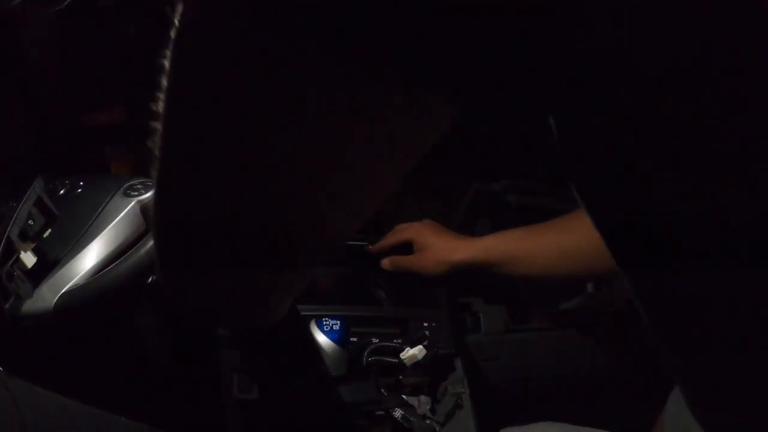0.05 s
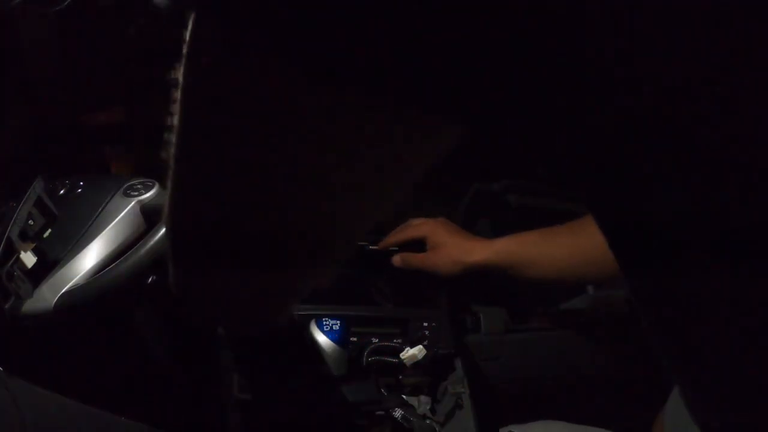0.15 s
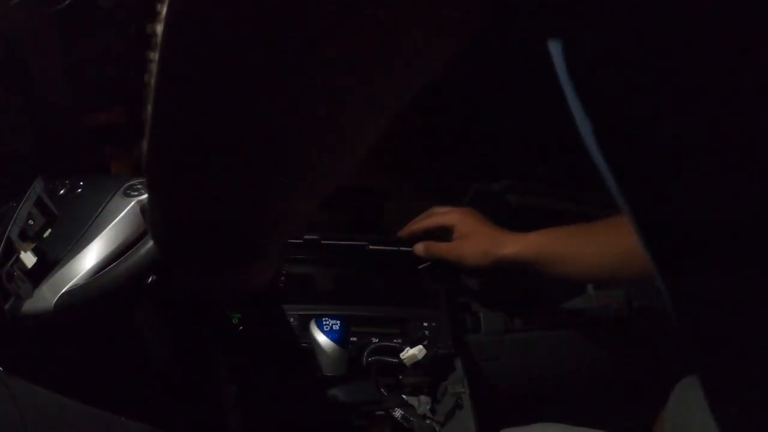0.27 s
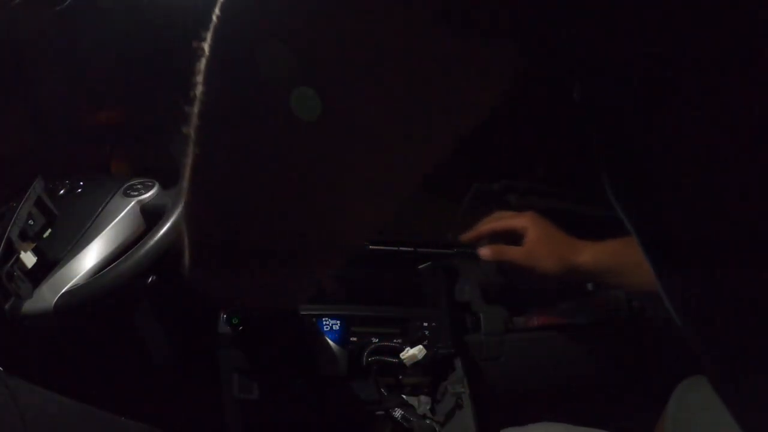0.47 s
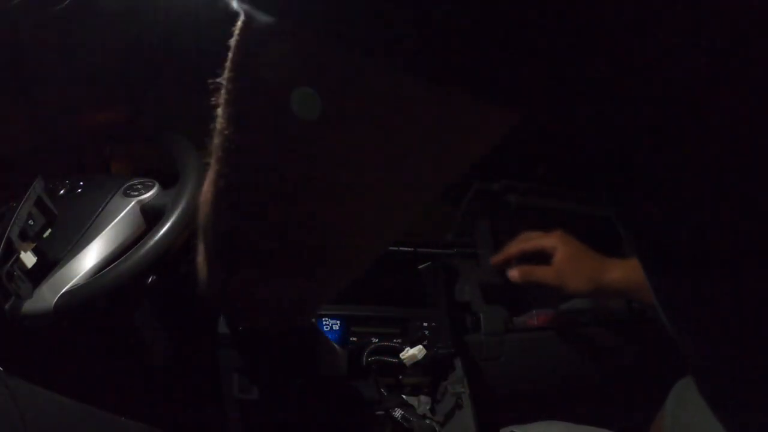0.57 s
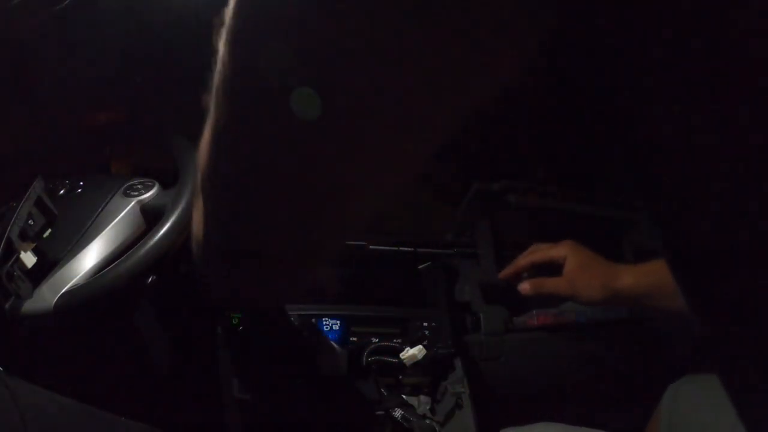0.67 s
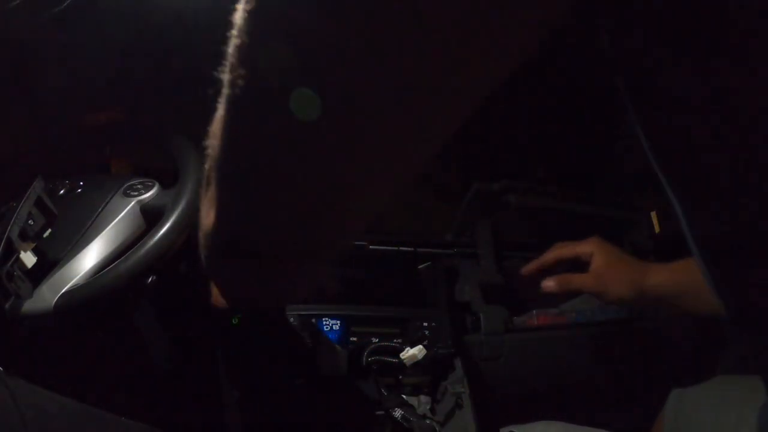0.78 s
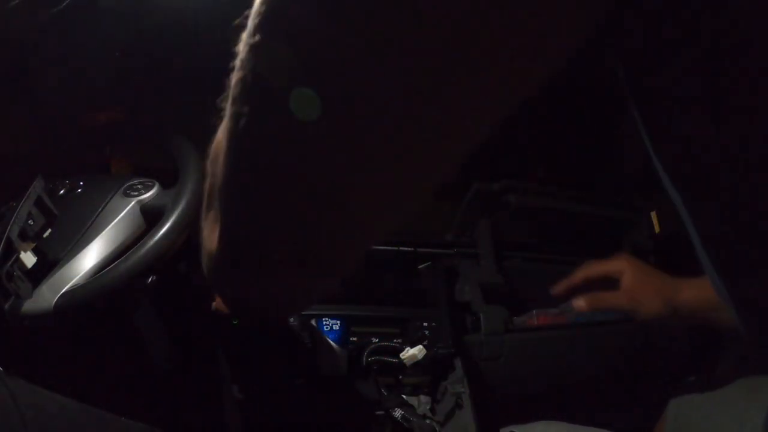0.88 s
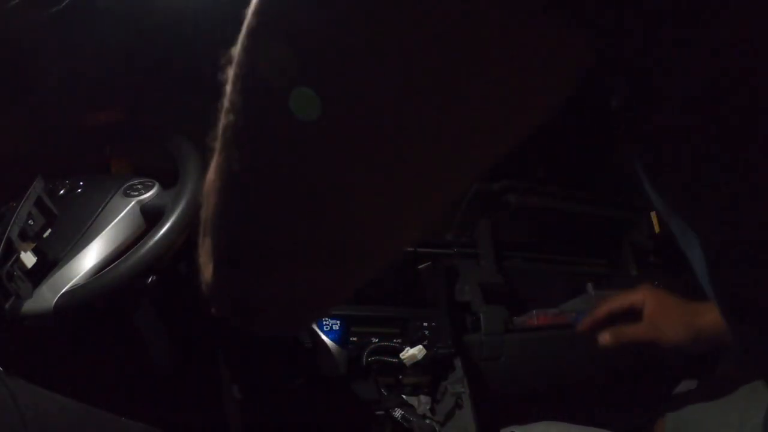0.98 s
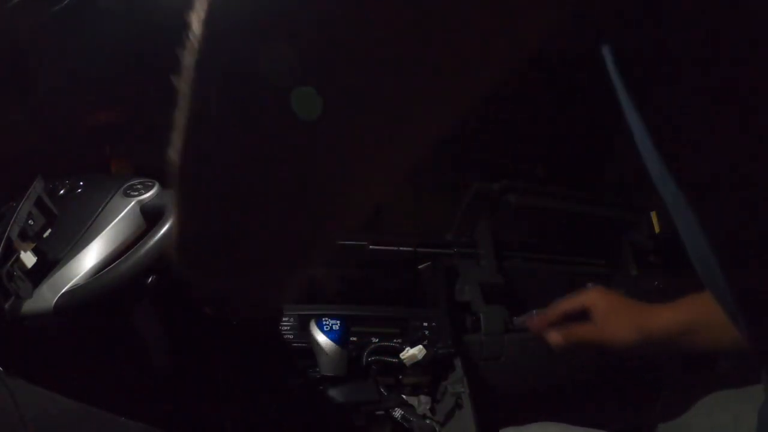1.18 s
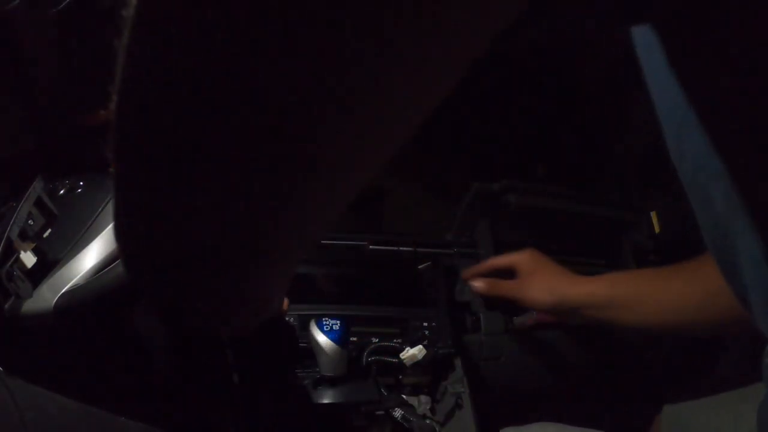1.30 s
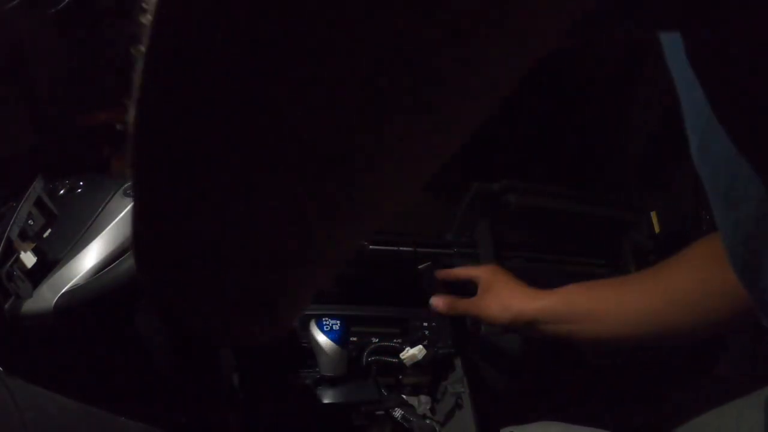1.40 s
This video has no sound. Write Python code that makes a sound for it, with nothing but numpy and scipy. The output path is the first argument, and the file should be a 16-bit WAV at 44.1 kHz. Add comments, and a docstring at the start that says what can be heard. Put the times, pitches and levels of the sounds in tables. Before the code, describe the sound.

A plastic dashboard compartment unlatches with a tick and a sharp double clunk at about 0.2 seconds, close and slightly left, briefly rattling loose parts. From 0.4 to 0.9 seconds fingers lightly scrape and tap hollow plastic while a sleeve rustles. Around 1.1 seconds the lid knocks and bumps more softly, followed by faint cloth rubbing near 1.3 seconds. A low rumble fills the quiet car throughout.

```python
"""Unlatching a dashboard compartment

Inside a quiet car, stereo microphone close to the dashboard; a low rumble fills the small padded cabin.
A hand works the plastic latch, just left of centre: a tick, then a sharp double clunk that rings the
trim and rattles loose parts. Fingers scrape and tap the hollow plastic, the lid bumps on its damped
stop, a sleeve rustles and an arm rubs on the upholstery."""
import sys
import numpy as np
from scipy import signal
from scipy.fft import rfft, irfft
from scipy.io import wavfile

SR = 44100
rng = np.random.default_rng(int(sys.argv[2]) if len(sys.argv) > 2 else 0)


def store_wav(level_fs):
    """Save 16-bit WAV to argv[1]."""
    pcm = np.round(np.clip(np.atleast_2d(level_fs), -1, 1) * 32767)
    wavfile.write(sys.argv[1], SR, pcm.T.astype(np.int16))


N = 63945

# stereo width of the noises at the microphone: f/Hz, side minus mid/dB
STEREO_WIDTH = [(50, -20.5), (250, -15), (700, -8), (2000, -7), (4500, -4.5), (12000, -2)]
# spectrum of the cabin rumble: f/Hz, relative density/dB
RUMBLE_COLOUR = [(12, -8.5), (28, 4.5), (45, 10.5), (68, -7.5), (115, -7), (180, -13), (300, -25),
                 (480, -30.5), (800, -48.5), (4000, -100)]
# the rumble swells and sinks: t/s, level/dB
RUMBLE_SWELLS = [(0, -39.5), (0.081, -39), (.17, -47), (.33, -34.5), (.40, -38.5), (0.531, -43),
                 (.64, -40.5), (.77, -46.5), (.85, -37.5), (.93, -39), (1.0, -44.5), (1.08, -34),
                 (1.12, -28), (1.21, -39), (1.45, -46)]
# spectrum of the faint air noise: f/Hz, relative density/dB
AIR_COLOUR = [(300, 0.5), (750, -6.5), (1250, -1), (1800, -14), (3000, -19), (6000, -24.5), (11000, -42.5),
              (16000, -65.5)]
# steady hum in the cabin: f/Hz, rms level/dB
HUM_TONES = [(47.5, -52.5), (95.5, -61.5)]
# the arm shifts against seat and console: t/s, level/dB, rise/s, hold/s, fall/s
ARM_SHIFTS = [(0.432, -48.5, 0.044, 0.047, 0.042), (0.618, -47.5, .06, 0.026, 0.052),
              (0.715, -46, 0.011, 0.066, 0.082), (0.828, -56, 0.02, 0.134, 0.11),
              (1.204, -47, 0.31, 0.11, 0.01)]
# spectrum of rubbed upholstery: f/Hz, relative density/dB
UPHOLSTERY_COLOUR = [(50, -7), (130, 3), (320, -7), (550, -19.5), (800, -25), (1500, -24.5), (8000, -53)]
# swishes of the sleeve: t/s, level/dB, rise/s, hold/s, fall/s, treble gain/dB
SLEEVE_SWISHES = [(-.01, -55.5, .02, 0.057, 0.042, 9), (0.41, -60.5, 0.025, 0.061, 0.011, 6),
                  (0.806, -56.5, 0.082, 0.011, 0.044, 2), (0.897, -59.5, 0.01, 0.006, 0.066, 0),
                  (1.059, -58.5, 0.0076, 0.012, 0.014, 1), (1.235, -52.5, 0.0049, 0.0033, 0.017, -15),
                  (1.29, -49.5, 0.042, 0.075, 0.17, 1)]
# spectrum of sliding cloth: f/Hz, relative density/dB
SLEEVE_COLOUR = [(300, -32), (800, -4), (1200, 5), (1700, -2.5), (2400, 3.5), (3600, -1), (4700, 3),
                 (6500, -6), (10000, -9), (13000, -17), (16000, -38)]
# fingers scrape the plastic: loudest at t/s, level/dB, rise/s, fall/s
FINGER_SCRAPES = [(0.197, -37, 0.015, 0.02), (0.43, -47, 0.018, 0.049), (0.458, -36.5, 0.035, 0.019),
                  (.625, -61.5, 0.083, 0.19), (0.746, -63, 0.0087, 0.023), (0.791, -54, 0.012, 0.021),
                  (0.819, -40, 0.014, 0.019), (0.901, -54, 0.02, 0.035), (1.089, -41, 0.02, 0.024),
                  (1.105, -38, 0.035, 0.045), (1.134, -41.5, 0.015, 0.0099)]
# spectrum of skin rubbing on plastic: f/Hz, relative density/dB
FRICTION_COLOUR = [(150, -24.5), (350, 9.5), (650, -5), (1000, -4.5), (1350, 5.5), (2100, 0.5),
                   (3700, -5.5), (4700, -14.5), (7500, -20.5), (12000, -41.5), (16000, -49)]
# light finger taps and catches on the console: t/s, level/dB, brightness/Hz
CONSOLE_TAPS = [(0.4255, -39, 2480), (0.445, -31.5, 7050), (0.4585, -28, 6000), (0.8097, -30, 8000),
                (0.8153, -25, 9000), (0.819, -26, 2000), (0.8262, -23, 700), (1.27, -36.5, 4000)]
# modes of the console's hollow plastic: f/Hz, level/dB, t60/s
CONSOLE_RESONANCES = [(438, -22.5, 0.034), (776, -15.5, 0.027), (1458, -15, 0.02), (1850, -21.5, 0.03),
                      (2060, -11, 0.03), (2954, -19.5, 0.028), (3256, -14, 0.028), (3920, -10.5, 0.027)]
# light knocks on the lid: t/s, level/dB, brightness/Hz
LID_KNOCKS = [(0.5992, -37.5, 1200), (0.7143, -23, 3440), (1.072, -30, 1970), (1.0861, -17.5, 5500),
              (1.1154, -24, 2500), (1.1304, -23, 2520), (1.2025, -26.5, 2800)]
# modes of the hollow lid: f/Hz, level/dB, t60/s
LID_RESONANCES = [(332, -13.5, 0.064), (550, -24, 0.028), (1165, -6.5, 0.027), (1821, -14, 0.035),
                  (2793, -17.5, 0.028), (4250, -13.5, 0.0095)]
# dull bumps of the lid on its damped stop: t/s, level/dB, f/Hz
LID_BUMPS = [(0.2074, -11, 146.8), (0.2126, -21, 67), (0.248, -26, 92.3), (0.289, -18.5, 46.8),
             (1.0963, -19, 130.5), (1.1197, -19, 135), (1.1490, -22, 59.3), (1.181, -24.5, 59),
             (1.281, -31.5, 114)]
# rattle of loose parts and close reflections: f/Hz, relative density/dB, t60/s
RATTLE_SPECTRUM = [(216, 6, 0.2), (405, 2, 0.062), (715, -9.5, 0.054), (1116, 5.5, 0.068), (1700, 3, 0.03),
                   (2210, -6, 0.059), (3595, -3.5, 0.029), (6000, -13, 0.046), (9740, -15, 0.018),
                   (14500, -31, 0.017)]
# modes of the trim panel around the latch: f/Hz, level/dB, t60/s
TRIM_RESONANCES = [(94.4, -25, 0.18), (129.4, -20.5, 0.25), (214.2, -18, 0.1), (311.2, -14.5, 0.12),
                   (388, -17, 0.08), (553, -18.5, 0.022)]
# modes of the latch's stiff plastic: f/Hz, level/dB, t60/s, left minus right/dB
LATCH_RESONANCES = [(560, -11.5, 0.011, 5.5), (915, -18, 0.0088, -4), (1205, -6.5, 0.015, 2),
                    (1784, -18.5, 0.019, 3.5), (2162, -12, 0.014, 4), (2278, -15.5, 0.0085, 3),
                    (2470, -10.5, 0.012, 6), (2886, -22.5, 0.011, 4.5), (4140, -33.5, 0.013, -2.5),
                    (5570, -36, 0.028, -1), (7660, -23, 0.0057, -5.5), (12400, -31, 0.0019, 1.5)]
# blows on latch and lid:
# t/s, latch level/dB, contact brightness/Hz, rattle level/dB, rattle brightness/Hz, trim level/dB
LATCH_BLOWS = [(0.1842, -31, 14000, -30, 20640, -45.5), (0.2017, -20, 9000, -19, 19600, -39),
               (0.2033, -10, 3000, -24, 6970, -22.5), (0.2069, -11, 2200, -21.5, 4500, -12.5),
               (0.2117, -19, 3000, -25, 2820, -5), (0.232, -18.5, 800, -33.5, 1950, -13),
               (0.2399, -23, 2500, -16, 2010, -4), (0.2427, 2, 5520, -19.5, 6070, -3),
               (0.24371, -9, 3012, -26, 6020, -18), (0.2539, -31, 2000, -44, 3020, -4),
               (0.265, -46, 2500, -45.5, 4040, -11), (1.0839, -35.5, 2000, -30, 4020, -20.5),
               (1.1140, -39, 2000, -29.5, 3900, -14.5), (1.1293, -26, 1500, -31, 3450, -21)]

TIME_S = np.arange(N) / SR
BINS_HZ = np.arange(N // 2 + 1) * SR / N


def from_db(db):
    """Decibels to gain."""
    return 10 ** (np.asarray(db) / 20)


def unit_power(x):
    """Scale to an rms of one."""
    return x / np.sqrt(np.mean(x ** 2) + 1e-20)


def at_hz(points, hz, column=1):
    """Read a column of a table on a log-frequency axis."""
    table = np.array(points)
    return np.interp(np.log(np.maximum(hz, 1)), np.log(table[:, 0]), table[:, column])


def shaped(x, colour):
    """Filter a signal by a table of f/Hz, level/dB."""
    return irfft(rfft(x) * from_db(at_hz(colour, BINS_HZ)), N)


def spread(mid, side):
    """A stereo image that is narrow in the bass and wide in the treble."""
    return mid + shaped(side, STEREO_WIDTH) * np.array([[1], [-1]])


def noise(colour):
    """Coloured stereo noise of unit power."""
    return unit_power(shaped(spread(*rng.standard_normal((2, N))), colour))


def stroke(start, db, rise, hold, fall):
    """Gain of one movement, full from start through hold; rise and fall are seconds per 20 dB."""
    before = np.maximum(start - TIME_S, 0)
    after = np.maximum(TIME_S - start - hold, 0)
    return from_db(db - 20 * (before / rise + after / fall))


def contact(start, db, bright_hz):
    """A push that is shorter and brighter the harder the contact."""
    click = np.zeros(N)
    click[int(start * SR)] = from_db(db)
    pole = np.exp(-2 * np.pi * bright_hz / SR)
    return signal.lfilter([1 - pole], [1, -pole], click + 1e-18)


def ring(pushes, modes, lag_cycles=0):
    """Pushes ring decaying sines; each starts lag_cycles of its periods late, so low ones come last."""
    out = 0
    for hz, db, t60 in modes:
        radius, angle = np.exp(-np.log(1000) / (t60 * SR)), 2 * np.pi * hz / SR
        feedback = [1, -2 * radius * np.cos(angle), radius * radius]
        arriving = np.interp(TIME_S - lag_cycles / hz, TIME_S, pushes)
        out = out + from_db(db) * signal.lfilter([0, np.sin(angle)], feedback, arriving + 1e-18)
    return out


def disperse(pushes, corner_hz=2470):
    """Bending waves in the plastic carry the treble first, turning a push into a push and a pull."""
    pole = np.exp(-2 * np.pi * corner_hz / SR)
    return signal.lfilter([pole, -1], [1, -pole], pushes)


def cabin(air_db=-62):
    """All around the microphone: a steady hum, a low uneven rumble and faint air noise."""
    hum = sum(from_db(db) * np.sqrt(2) * np.sin(2 * np.pi * (hz * TIME_S + rng.random()))
              for hz, db in HUM_TONES)
    rumble_db = np.interp(TIME_S, *np.transpose(RUMBLE_SWELLS))
    return hum + noise(RUMBLE_COLOUR) * from_db(rumble_db) + noise(AIR_COLOUR) * from_db(air_db)


def arm():
    """An arm rubs on the upholstery with a muffled hiss."""
    return noise(UPHOLSTERY_COLOUR) * sum(stroke(*shift) for shift in ARM_SHIFTS)


def sleeve(flicker_db=1.7, flicker_hz=88.2, treble_hz=6300):
    """Cloth slides with a slightly grainy hiss, brighter in some swishes than in others."""
    hiss = noise(SLEEVE_COLOUR)
    flicker = unit_power(np.interp(TIME_S * flicker_hz, np.arange(N), rng.standard_normal(N)))
    hiss = hiss * from_db(flicker_db * flicker)
    treble = shaped(hiss, [(treble_hz / 2, -20), (treble_hz, 0)])
    return sum(stroke(*swish) * (hiss + (from_db(treble_db) - 1) * treble)
               for *swish, treble_db in SLEEVE_SWISHES)


def finger_scrapes(slips_per_s=1400, slip_spread_db=5.5, smooth_share=0.35):
    """Fingers drag over plastic: tiny uneven slips on top of smooth friction noise."""
    sizes = from_db(slip_spread_db * np.minimum(rng.exponential(1, N), 3))
    slipping = rng.random(N) < slips_per_s / SR
    clicks = sizes * slipping * rng.choice([-1, 1], (2, N))
    slips = unit_power(shaped(spread(*clicks), FRICTION_COLOUR))
    friction = np.sqrt(1 - smooth_share) * slips + np.sqrt(smooth_share) * noise(FRICTION_COLOUR)
    return friction * sum(stroke(start, db, rise, 0, fall) for start, db, rise, fall in FINGER_SCRAPES)


def console_taps(left_minus_right_db=4):
    """Left of the microphone, fingers ring the hollow console; each tick trails downward in pitch."""
    pushes = sum(contact(*tap) for tap in CONSOLE_TAPS)
    pan = from_db(np.array([[1], [-1]]) * left_minus_right_db / 2)
    return pan * ring(pushes, CONSOLE_RESONANCES, lag_cycles=4.46)


def lid_knocks(fingertip_hz=6550, scatter_db=2.5, skid_db=-16.5, skid_rise_s=0.0013, skid_fall_s=0.011):
    """A soft fingertip rings the hollow lid and skids briefly as it lands."""
    softening = signal.butter(2, fingertip_hz, fs=SR, output="sos")
    grit, out = noise(FRICTION_COLOUR), 0
    for start, level_db, bright_hz in LID_KNOCKS:
        # each knock lands on another spot and weights the modes differently
        modes = [(hz, db + scatter_db * rng.standard_normal(), t60) for hz, db, t60 in LID_RESONANCES]
        push = signal.sosfilt(softening, contact(start, level_db, bright_hz))
        skid = grit * stroke(start + skid_rise_s, level_db + skid_db, skid_rise_s, 0, skid_fall_s)
        out = out + ring(push, modes, lag_cycles=1.21) + skid
    return out


def lid_bumps(cycles_to_peak=0.54):
    """The lid meets its stop: heavily damped low swings of lid and dashboard."""
    out = 0
    for start, db, hz in LID_BUMPS:
        cycles = np.maximum(TIME_S - start, 0) * hz
        swell = cycles / cycles_to_peak
        envelope = (swell * np.exp(1 - swell)) ** 2
        out = out + from_db(db) * envelope * np.sin(2 * np.pi * cycles)
    return out


def rattle(attack_s=0.0011, crack_db=-0.5, crack_s=0.0015):
    """Loose parts and close reflections follow each blow: a crack, then a burst whose treble dies first."""
    spectrum, out = rfft(noise(RATTLE_SPECTRUM)), 0
    centres_hz = np.geomspace(150, 15000, 11)
    log_hz = np.log(np.maximum(BINS_HZ, 1))
    for hz, weights in zip(centres_hz, np.eye(len(centres_hz))):
        band = irfft(spectrum * np.interp(log_hz, np.log(centres_hz), weights), N)
        t60 = at_hz(RATTLE_SPECTRUM, hz, column=2)
        power = np.zeros(N)
        for start, _, _, db, bright_hz, _ in LATCH_BLOWS:
            onset = int(start * SR)
            age = TIME_S[:min(N - onset, N // 4)]
            fade = (1 - np.exp(-age / attack_s)) * np.exp(-np.log(1000) * age / t60)
            crack = 1 + from_db(crack_db) * np.exp(-age / crack_s)
            power[onset:onset + len(age)] += (from_db(db) * fade * crack) ** 2 / (1 + (hz / bright_hz) ** 2)
        out = out + band * np.sqrt(power)
    return out


def latch(right_delay_s=0.000022):
    """Close up and a little to the left, each blow rings the stiff latch and the trim panel around it."""
    pushes = disperse(sum(contact(start, db, hz) for start, db, hz, *_ in LATCH_BLOWS))
    left = ring(pushes, [(hz, db + pan / 2, t60) for hz, db, t60, pan in LATCH_RESONANCES])
    right = ring(pushes, [(hz, db - pan / 2, t60) for hz, db, t60, pan in LATCH_RESONANCES])
    right = np.interp(TIME_S - right_delay_s, TIME_S, right)
    trim_pushes = sum(contact(start, trim_db, bright_hz=870) for start, *_, trim_db in LATCH_BLOWS)
    return np.array([left, right]) + ring(trim_pushes, TRIM_RESONANCES)


def scene():
    """Compartment, hand and cabin as they reach the microphone."""
    compartment = latch() + rattle() + lid_bumps() + lid_knocks()
    return compartment + console_taps() + finger_scrapes() + sleeve() + arm() + cabin()


def record(dry, ceiling=0.95, cutoff_hz=16300):
    """The microphone chain rounds off the highest peak and cuts the top of the treble."""
    rounded = dry / (1 + (dry / ceiling) ** 8) ** (1 / 8)
    return signal.sosfilt(signal.cheby2(16, 60, cutoff_hz, fs=SR, output="sos"), rounded)


dry = scene()
out = record(dry)
store_wav(out)
```